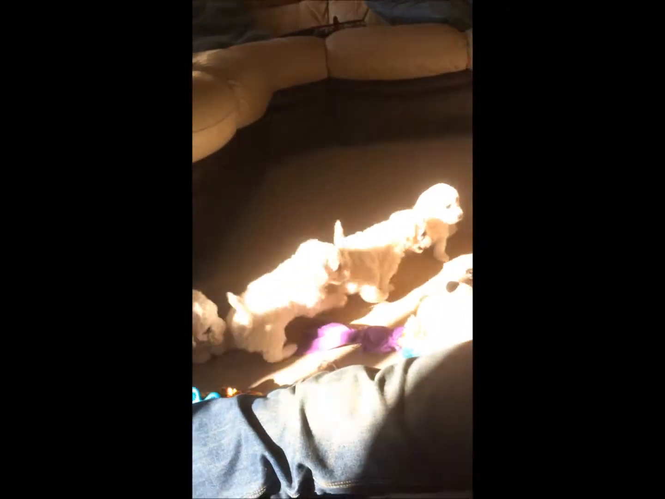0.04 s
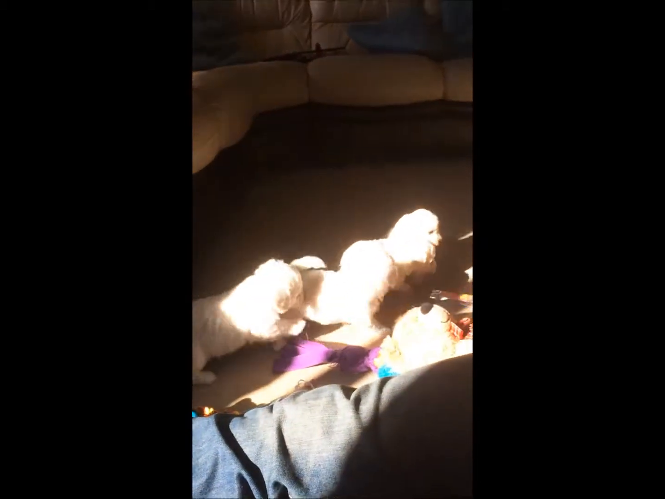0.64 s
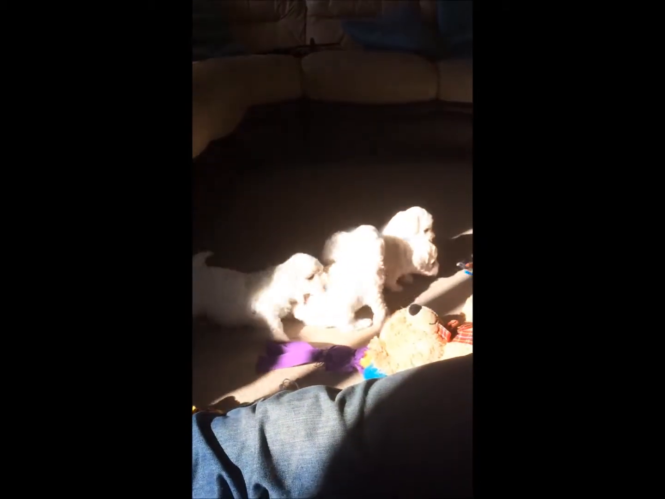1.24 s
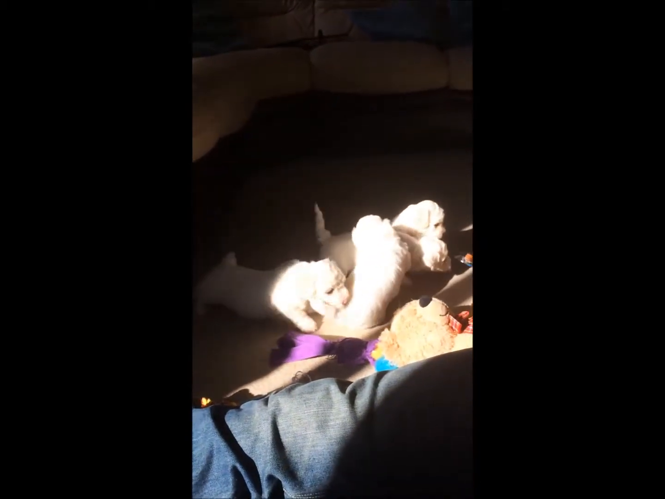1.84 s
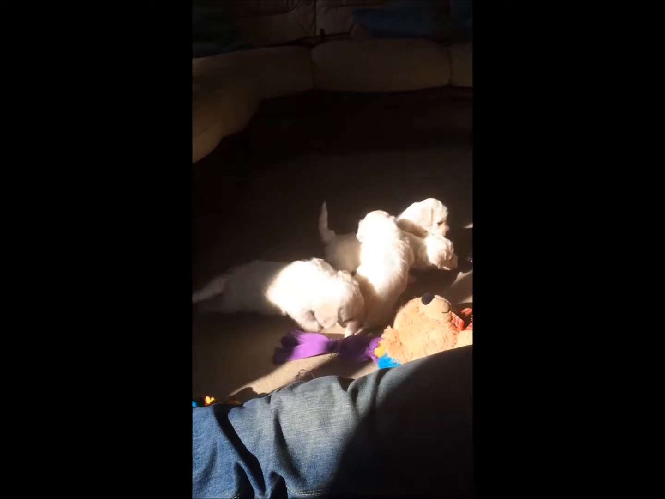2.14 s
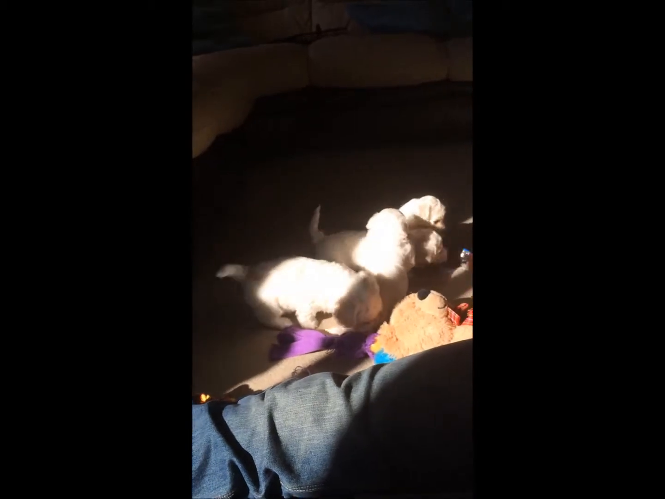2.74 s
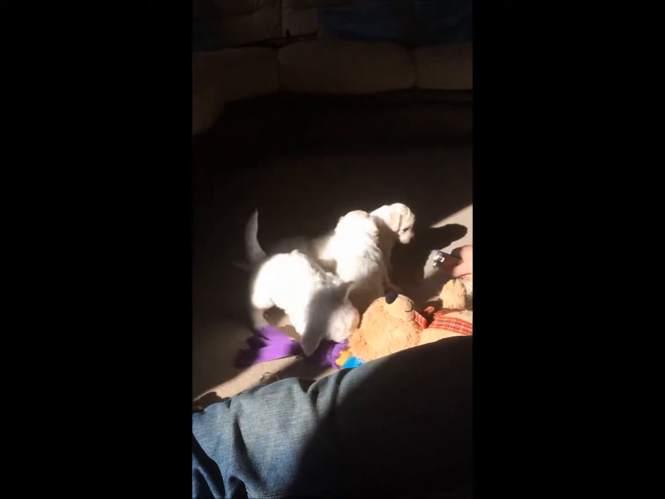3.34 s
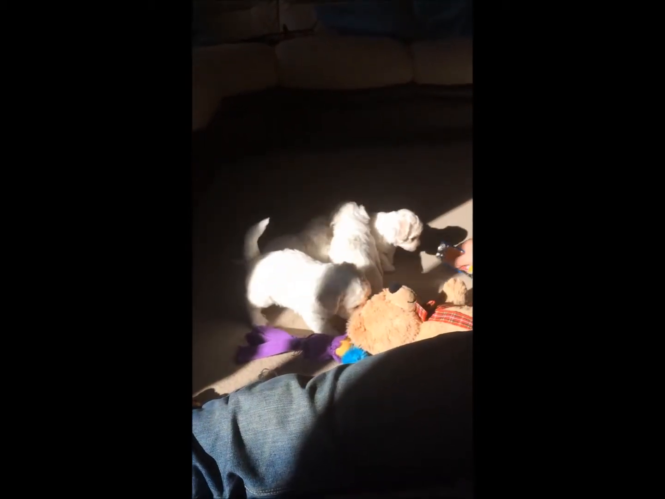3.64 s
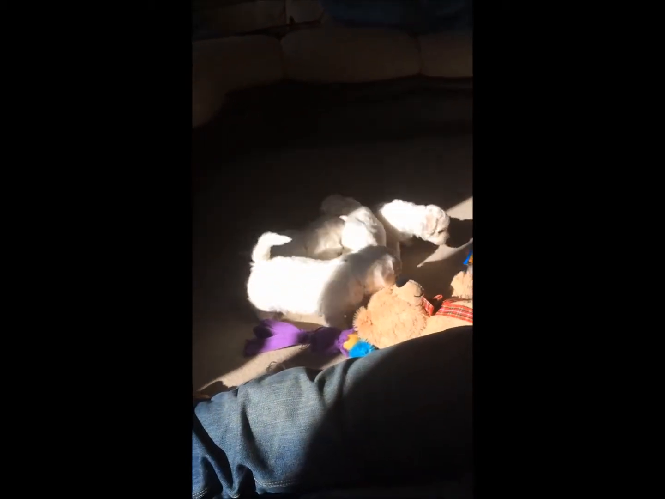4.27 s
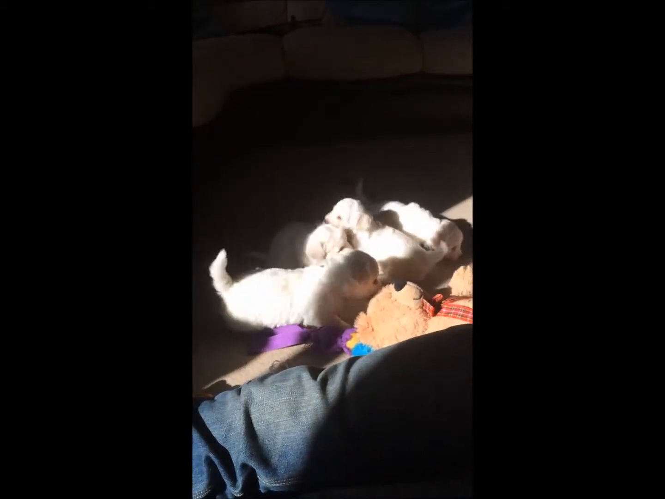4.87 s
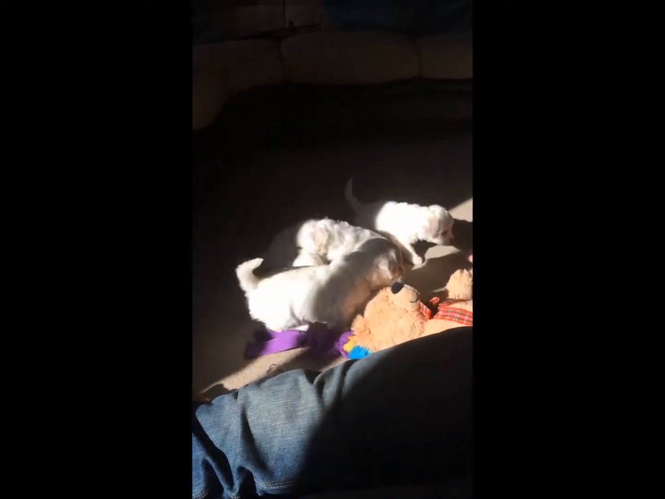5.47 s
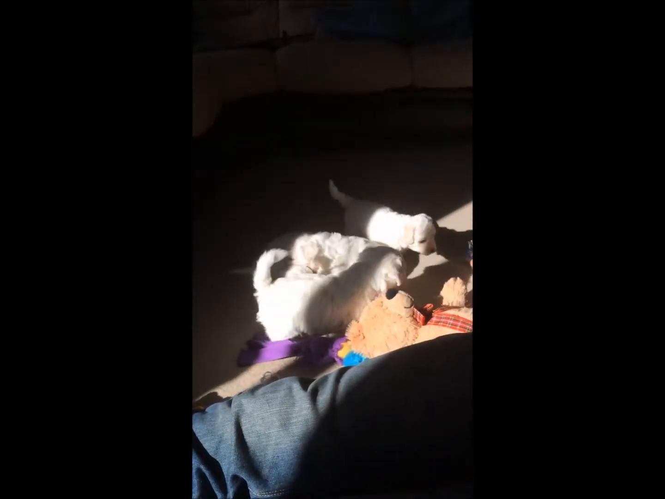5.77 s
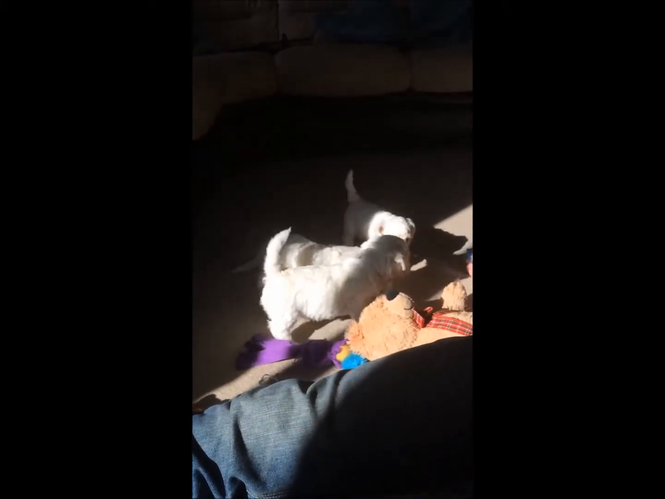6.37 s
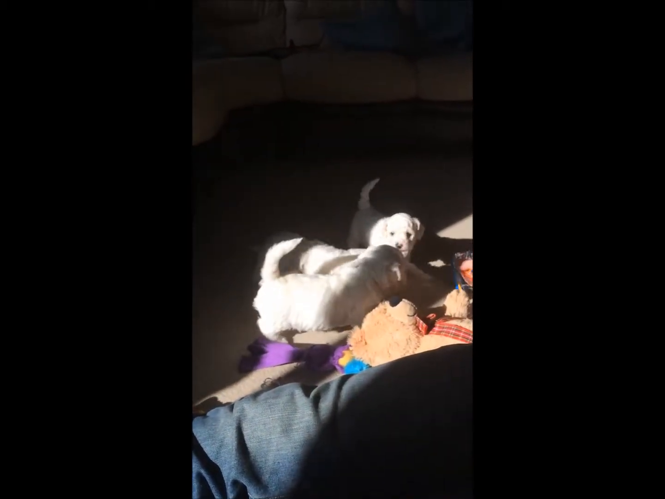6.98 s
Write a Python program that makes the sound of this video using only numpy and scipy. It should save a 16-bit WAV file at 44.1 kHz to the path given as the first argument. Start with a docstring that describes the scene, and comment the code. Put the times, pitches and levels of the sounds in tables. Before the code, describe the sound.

Soft bumps on the floor and a grainy rustle of fur and cloth open the scene as puppies play with a crinkly toy. Their tugs soon draw busier, crisper crackling from the film inside, with the sharpest snap a little past the middle. A few small clicks of claws or teeth come through. The microphone is near the play in a quiet, furnished room, where an appliance hums faintly throughout.

```python
"""Crinkly film snaps and crackles inside a soft toy as puppies worry it on a living-room floor.
Each tug works the film harder: big creases pop through, countless small ones give way in clumps.
Fur and fabric catch and slip in a grainy hiss, claws and teeth rap on the toy, and paws and bodies
thud on the floor. Short room reflections surround the play, and an appliance hums faintly behind it."""
import sys
import numpy as np
from scipy import signal
from scipy.fft import rfft, irfft
from scipy.io import wavfile
from scipy.ndimage import uniform_filter1d

SR = 44100
rng = np.random.default_rng(int(sys.argv[2]) if len(sys.argv) > 2 else 0)


def to_wav(s):
    """Save 16-bit WAV."""
    ch = np.atleast_2d(s).T  # columns
    pcm = np.round(np.clip(ch, -1, 1) * 32767)  # PCM
    wavfile.write(sys.argv[1], SR, pcm.astype(np.int16))


N = 313551
TIME = np.arange(N) / SR

# partials of the appliance hum: (frequency [Hz], rms level [dB])
HUM_PARTIALS = [(99.3, -69), (125.5, -80)]
# tone of the room air, shifting bodies, fur, fabric and film: (frequency [Hz], relative level [dB])
AIR_SPECTRUM = [(25, -30), (45, -3), (68, 7.5), (85, -22), (108, -31), (125, 3), (165, -9.5), (240, -7.5),
                (330, -6), (450, -5), (700, -17), (1500, -20), (4000, -17), (5000, -19), (15000, -28)]
BODY_SPECTRUM = [(40, -3.5), (68, 0), (95, 3), (135, 4.5), (220, -3.5), (400, -4.5), (1000, -25.5),
                 (4000, -35)]
FUR_SPECTRUM = [(200, -1.5), (280, -7.5), (420, 0.5), (600, 0.5), (850, 0), (1200, -2), (1500, -3.5),
                (2200, -27), (6000, -36)]
FABRIC_SPECTRUM = [(600, -17), (1100, -0.5), (1500, 1.5), (1950, 2.5), (2300, 1.5), (3100, -1),
                   (3700, -2.5), (4800, -14.5), (8000, -17), (15000, -46)]
FILM_SPECTRUM = [(1500, -20.5), (2800, -2), (3800, -2), (5200, -0.5), (7000, -3.5), (9000, -6), (11500, -8),
                 (13500, -5), (15500, -9.5)]
# the litter's constant stirring: (time [s], fur level [dB], fabric level [dB], film level [dB])
STIR_LEVELS = [(0, -66, -59, -63), (0.299, -63, -56.5, -59), (.6, -58.5, -58.5, -61),
               (0.748, -67.5, -62, -68), (1.2, -64, -63, -63), (1.78, -78, -70.5, -73),
               (2.1, -71.5, -65, -66.5), (2.451, -72.5, -68, -68), (2.7, -74.5, -79, -79.5),
               (2.85, -69, -71, -68.5), (3.17, -66, -64.5, -68), (3.6, -66.5, -58, -59),
               (4.2, -68.5, -61.5, -59), (5.0, -66.5, -58.5, -60), (5.44, -72.5, -63.5, -63),
               (5.981, -69.5, -59.5, -59), (6.08, -71, -63, -64), (6.35, -71.5, -64, -64.5),
               (7.11, -76, -66.5, -58)]
# a puppy tugs at the toy: (start [s], length [s], fabric level [dB], film level [dB])
TOY_TUGS = [(0.021, 0.035, -67, -59), (0.146, 0.038, -53, -58), (0.272, 0.11, -63.5, -57),
            (0.518, 0.066, -70, -62), (0.932, 0.022, -60, -65), (0.988, 0.11, -65, -57),
            (1.088, .05, -52.5, -56), (1.194, .04, -68, -61), (1.314, 0.023, -62, -60),
            (1.476, 0.023, -61, -58), (1.606, 0.011, -59.5, -56), (1.828, 0.048, -61.5, -59.5),
            (1.977, 0.037, -62, -60), (2.103, 0.018, -59.5, -54.5), (2.228, 0.019, -55.5, -55.5),
            (2.328, 0.014, -55, -51), (2.37, .04, -54.5, -56), (2.736, 0.033, -50.5, -53),
            (2.782, 0.062, -44.5, -47), (2.829, .055, -48, -47), (2.915, .02, -52.5, -52),
            (2.969, 0.023, -53.5, -55.5), (3.208, 0.04, -51, -51.5), (3.26, 0.032, -44.5, -46),
            (3.312, .035, -54, -52), (3.456, 0.078, -49, -46), (3.657, 0.034, -59, -54),
            (3.744, 0.046, -47, -45), (3.879, 0.017, -52.5, -46), (3.967, 0.049, -51.5, -48),
            (4.061, 0.053, -61.5, -55.5), (4.273, 0.049, -50.5, -51.5), (4.37, 0.044, -53.5, -48),
            (4.453, 0.022, -58.5, -51), (4.589, 0.077, -56.5, -50), (4.682, 0.13, -61, -49.5),
            (4.812, 0.032, -50.5, -44.5), (4.921, 0.013, -50.5, -37), (5.163, 0.059, -52.5, -49.5),
            (5.32, .015, -63, -53.5), (5.495, 0.053, -55.5, -55), (5.699, 0.092, -54.5, -50),
            (5.799, 0.037, -62, -49.5), (5.88, 0.098, -74, -50.5), (6.131, 0.033, -55.5, -53.5),
            (6.192, .06, -54, -50), (6.381, 0.039, -57.5, -53), (6.446, 0.022, -49, -48),
            (6.483, 0.049, -48.5, -45), (6.549, 0.03, -52, -51.5), (6.625, 0.062, -55.5, -50),
            (6.692, 0.019, -67, -56.5), (6.796, 0.016, -59, -52.5), (6.833, 0.013, -50, -44.5),
            (6.969, 0.059, -57, -52.5), (7.036, 0.031, -52.5, -48)]
# paws and bodies hit the floor: (time [s], level [dB], pitch [Hz], 60 dB decay time [s])
FLOOR_BUMPS = [(0.021, -40, 68, 0.32), (0.042, -46, 413, 0.22), (0.147, -53, 128.5, 0.6),
               (0.196, -37, 410, 0.057), (0.234, -52.5, 135, 0.35), (0.3, -49.5, 516, 0.26),
               (0.336, -40, 414, 0.09), (0.533, -42.5, 124.8, 0.23), (0.585, -34.5, 134, 0.15),
               (0.591, -52, 297, 0.2), (0.632, -48.5, 123, 0.72), (0.829, -40.5, 132, 0.054),
               (1.321, -32.5, 160, 0.061), (1.341, -37.5, 483, 0.019), (1.372, -45.5, 90, 0.16),
               (1.496, -41, 115, 0.049), (1.954, -54.5, 130.8, 0.39), (2.279, -42.5, 138.4, 0.16),
               (3.087, -35.5, 640, 0.016), (3.202, -41, 127.7, 0.15), (3.288, -32, 109.6, 0.1),
               (3.29, -43, 256.4, 0.066), (3.331, -40, 102, 0.14), (4.297, -47, 512, 0.045),
               (4.52, -39, 98, 0.053), (4.766, -53, 80.5, 0.097), (5.653, -50, 146.4, 0.12),
               (5.868, -38.5, 360, 0.049), (5.873, -43, 127.7, 0.063), (5.908, -41.5, 110, 0.077),
               (6.134, -50, 170, 0.076), (6.716, -32.5, 490, 0.023), (6.747, -50, 76, 0.056)]
# claws and teeth hit the toy: (time [s], level [dB], pitch [Hz], 60 dB decay time of the rasp [s])
TOY_KNOCKS = [(0.1782, -36, 2050, 0.011), (.074, -38, 780, 0.011), (1.714, -50.5, 485, 0.044),
              (1.975, -43.5, 1910, 0.012), (2.507, -54.5, 588, 0.024), (2.8785, -30, 2020, 0.0059),
              (4.835, -37, 1920, 0.011), (5.599, -34.5, 2120, 0.01), (6.779, -45, 2290, 0.014)]
# how much the film creases rather than slides: (time [s], grain level against hiss [dB])
CREASE_BALANCE = [(0, -3.5), (1.15, -11), (1.5, -0.5), (2.7, 2), (3.6, 5), (5.2, 1), (7.1, 5)]
# big creases of the film popping through: (time [s], level [dB], pitch [Hz])
BIG_CREASES = [(.144, -47.5, 8900), (.381, -46.5, 5800), (.973, -53, 6300), (1.1481, -47, 7100),
               (1.223, -51, 5500), (1.4033, -54.5, 4660), (1.4769, -41, 8550), (1.881, -48.5, 6130),
               (2.373, -42, 6400), (2.7697, -48, 5800), (2.8434, -33.5, 6400), (2.871, -50, 7580),
               (2.8786, -30.5, 2860), (2.935, -40, 9820), (2.9818, -47, 4940), (3.2027, -39.5, 4400),
               (3.2742, -37, 7830), (3.2918, -36, 6660), (3.3173, -39, 7400), (3.3575, -47, 6300),
               (3.4357, -50, 6600), (3.5335, -37.5, 9000), (3.5663, -39, 4530), (3.6059, -44.5, 8750),
               (3.6784, -40, 5770), (3.7237, -50, 7040), (3.779, -35.5, 7470), (3.8165, -40, 7750),
               (3.8853, -38, 6540), (3.8969, -33, 6970), (3.9386, -37.5, 7580), (3.99, -37, 7230),
               (4.0094, -34, 8000), (4.0145, -37, 7900), (4.2619, -36, 8140), (4.311, -40, 7310),
               (4.3547, -40, 9120), (4.4093, -35.5, 6030), (4.4615, -36.5, 5650), (4.4998, -42.5, 7660),
               (4.5812, -39.5, 7180), (4.619, -33.5, 6660), (4.6755, -36, 6600), (4.7047, -36, 4900),
               (4.7354, -30, 7610), (4.7989, -34, 6870), (4.8339, -18, 9000), (4.843, -31, 6970),
               (4.92, -32, 10280), (4.9397, -29, 8770), (4.9501, -34, 6400), (5.047, -46, 7640),
               (5.1234, -42, 6060), (5.153, -36, 9670), (5.171, -41, 5110), (5.1817, -40.5, 7150),
               (5.1962, -38, 9540), (5.247, -44, 8170), (5.5039, -43, 4820), (5.581, -43.5, 7100),
               (5.5385, -39, 5160), (5.704, -37.5, 6210), (5.728, -41.5, 7650), (5.7692, -43.5, 7280),
               (5.8105, -39.5, 9040), (5.848, -43, 10500), (5.968, -37, 10700), (6.091, -44, 10000),
               (6.126, -37, 6700), (6.2317, -39.5, 4400), (6.252, -43, 9300), (6.4099, -45, 6300),
               (6.4472, -37.5, 6420), (6.461, -37, 7740), (6.5057, -33.5, 5940), (6.5212, -36, 5170),
               (6.5545, -32, 4270), (6.6681, -37, 6200), (6.7965, -33.5, 10100), (6.84, -34.5, 7230),
               (6.9682, -43.5, 4600), (7.012, -43, 6250), (7.0987, -42.5, 6020)]

# faders, added to the levels in the tables
SHUFFLE_DB, BUMP_DB, FABRIC_DB, CRACKLE_DB, SNAP_DB = -3.5, -2.5, -2.5, -2, 2.5


def from_db(db):
    """Decibels to amplitude."""
    return 10 ** (np.asarray(db) / 20)


def unit_rms(x):
    """Scale to an rms of 1."""
    return x / np.sqrt(np.mean(x ** 2) + 1e-20)


def level_out(x):
    """Ride the running level towards 1 and keep the fine grain."""
    x = unit_rms(x)
    return x / np.sqrt(np.maximum(uniform_filter1d(x ** 2, size=1800), 0) + 0.0079)


def add(out, start_s, sound):
    """Mix a short sound in at start_s."""
    at = int(np.clip(round(start_s * SR), 0, N - 1))
    out[at:at + len(sound)] += sound[:N - at]


def drift(rate_hz):
    """Smooth random modulation with a spread of 1."""
    pole = np.exp(-40 * np.pi * rate_hz / SR)
    noise = rng.standard_normal(N // 20 + 4002)
    slow = signal.lfilter([1], [1, -2 * pole, pole * pole], noise)[4000:]
    return np.interp(np.arange(N) / 20, np.arange(len(slow)), unit_rms(slow))


def colour(x, spectrum):
    """Minimum-phase EQ with the given curve; white noise keeps its power."""
    hz, db = np.transpose(spectrum)
    size = 2 ** 13
    grid = np.maximum(np.fft.rfftfreq(size, 1 / SR), 1)
    curve = from_db(np.interp(np.log(grid), np.log(hz), db))
    gain = unit_rms(curve * np.minimum(grid / hz[0], 1))
    cepstrum = irfft(np.log(gain + 1e-9))
    cepstrum[1:size // 2] *= 2
    cepstrum[size // 2 + 1:] = 0
    return signal.fftconvolve(x, irfft(np.exp(rfft(cepstrum))))[:len(x)]


def cut(x, kind, hz, order=2):
    """Butterworth low-, high- or band-pass."""
    return signal.sosfilt(signal.butter(order, hz, kind, fs=SR, output="sos"), x)


def resonate(x, hz, q):
    """One resonance, with a gain of 1 at its peak."""
    return signal.lfilter(*signal.iirpeak(min(hz, .4 * SR), q, fs=SR), x + 1e-18)


def noise_band(length, hz, q):
    """Noise around one pitch, at an rms of 1."""
    return unit_rms(resonate(resonate(rng.standard_normal(length), hz, q), hz, q))


def room_tone(air_db=-70, waver_db=1.5):
    """A bed of room air and the softly wavering hum of an appliance."""
    waver, phase = waver_db * drift(2), .2 * drift(.7)
    hum = sum(from_db(db + waver) * np.sqrt(2) * np.sin(2 * np.pi * hz * TIME + phase)
              for hz, db in HUM_PARTIALS)
    return hum + from_db(air_db) * colour(rng.standard_normal(N), AIR_SPECTRUM)


def room_tail(t60_s=.32, treble_t60_s=.0576, split_hz=8000, predelay_s=.001):
    """Diffuse reflections; the furniture soaks up the treble first."""
    t = TIME[:SR // 2]
    mids = cut(rng.standard_normal(len(t)), "band", [220, split_hz]) * from_db(-60 * t / t60_s)
    treble = cut(rng.standard_normal(len(t)), "high", split_hz) * from_db(-60 * t / treble_t60_s)
    tail = (mids + 1.34 * treble) * (t > predelay_s)
    return tail / np.sqrt(np.sum(tail ** 2))


def living_room(x, places=12, wet_db=-12):
    """The puppies keep moving, so the reflections crossfade from place to place."""
    position = np.linspace(0, places - 1, N)
    sends = (np.sqrt(np.maximum(1 - np.abs(position - k), 0)) for k in range(places))
    wet = sum(signal.oaconvolve(x * send, room_tail())[:N] for send in sends)
    return x + from_db(wet_db) * wet


def play_levels(attack_s=.012, build_db=3.5, release_db_per_s=230, fur_in_tug_db=-11.5):
    """Fur, fabric and film envelopes in dB: over the stirring, each tug grabs, builds and lets go."""
    times, *levels = np.transpose(STIR_LEVELS)
    fur, fabric, film = [from_db(np.interp(TIME, times, db)) ** 2 for db in levels]  # add as powers
    t = TIME[:SR // 2]
    for start, length, fabric_db, film_db in TOY_TUGS:
        build = from_db(-build_db * np.maximum(1 - t / length, 0))
        release = from_db(-release_db_per_s * np.maximum(t - length, 0))
        envelope = np.minimum(t / attack_s, 1) * build * release
        add(fur, start, (from_db(fabric_db + fur_in_tug_db) * envelope) ** 2)
        add(fabric, start, (from_db(fabric_db) * envelope) ** 2)
        add(film, start, (from_db(film_db) * envelope) ** 2)
    return 10 * np.log10([fur, fabric, film])


def body_shuffle(fur_db, follow=.64):
    """Bodies shifting on the floor rumble softly along with the brushing of fur."""
    level_db = fur_db.mean() + follow * (fur_db - fur_db.mean())
    return from_db(level_db + SHUFFLE_DB) * colour(rng.standard_normal(N), BODY_SPECTRUM)


def floor_bumps(attack_s=.0019, sag_hz=68):
    """Padded blows: a damped swing of the floor, a dull scuff and, under the low ones, a slower sag."""
    out, t = np.zeros(N), TIME[:SR // 3]
    for start, db, hz, t60 in FLOOR_BUMPS:
        swing = np.sin(2 * np.pi * hz * t)
        scuff = .51 * noise_band(len(t), hz, q=1.05)
        sag = .42 * (hz < 200) * np.sin(2 * np.pi * sag_hz * t)
        envelope = from_db(db + BUMP_DB - 60 * t / t60) * (1 - np.exp(-t / attack_s))
        add(out, start, envelope * (swing + scuff + sag))
    return cut(out, "high", 40)


def toy_knocks():
    """A claw or tooth meets the toy: a dry rasp with a ping that dies twice as fast."""
    out, t = np.zeros(N), TIME[:SR // 16]
    for start, db, hz, t60 in TOY_KNOCKS:
        decay = from_db(-60 * t / t60)
        ping = np.sin(2 * np.pi * hz * t) * decay ** 2
        rasp = noise_band(len(t), hz, q=1.4) * decay
        add(out, start, from_db(db) * (ping + rasp) / np.sqrt(2))
    return out


def fibre_rub(level_db, spectrum, catch_db, catch_hz):
    """Fibres catch and slip, so the friction hiss is grainy."""
    friction = unit_rms(rng.standard_normal(N) * from_db(catch_db * drift(catch_hz)))
    return from_db(level_db) * colour(friction, spectrum)


def film_crackle(level_db, clicks_per_s=1000, clump_db=4.5, size_db=2.5, crisp_hz=9000):
    """Countless small creases give way in clumps over a sliding hiss; their balance changes over time."""
    effort_db = level_db - level_db.mean()
    rate = clicks_per_s * from_db(.5 * effort_db + clump_db * drift(45))
    sizes = from_db(size_db * np.minimum(rng.exponential(1, N), 11.3)) * rng.choice([-1, 1], N)
    clicks = sizes * (rng.random(N) < rate / SR)
    facet_hz = np.geomspace(3000, 14000, 10)
    facet = rng.choice(len(facet_hz), N)  # each click rings one facet of the film
    grains = level_out(sum(resonate(clicks * (facet == k), hz, q=5.6) for k, hz in enumerate(facet_hz)))
    grain_db = np.interp(TIME, *np.transpose(CREASE_BALANCE)) + .067 * effort_db
    slide = rng.standard_normal(N)
    film = level_out(colour(from_db(grain_db) * grains + slide, FILM_SPECTRUM))
    # the film goes taut and slack by chance, and taut film sounds crisper
    tilt_db = .8 + 2.5 * drift(3.3)
    low = cut(film, "low", crisp_hz, order=4) * from_db(-tilt_db / 2)
    top = cut(film, "high", crisp_hz, order=4) * from_db(tilt_db / 2)
    return from_db(level_db + CRACKLE_DB) * (low + top)


def lesser_creases(film_db, brisk_db=-53.5, pops_per_s=30, pop_db=-51, pop_hz=7100, count=400):
    """Strain lets go unevenly, faster and louder under effort: (time [s], level [dB], pitch [Hz])."""
    effort_db = film_db - brisk_db  # pops_per_s and pop_db hold when the film is at brisk_db
    strain = np.cumsum(pops_per_s * from_db(.9 * effort_db)) / SR
    delay, size, detune = np.clip(rng.standard_normal((count, 3)), -2, 2).T
    thresholds = np.arange(count) + delay
    times = np.interp(thresholds, strain, TIME)
    db = pop_db + .49 * np.interp(times, TIME, effort_db) + 1.5 * size
    hz = pop_hz * 2 ** (.35 * detune)
    return np.transpose([times, db, hz])[(thresholds > 0) & (thresholds < strain[-1])]


def film_snaps(creases, splinter_s=.0003, lag_s=.0003, body_hz=1884, body_db=-4, max_snaps=500):
    """A crease starts to slip, pops in one jump, splinters and rings its own facet of film."""
    out, t = np.zeros(N), TIME[:512] - TIME[64]  # the jump is at t = 0
    splinters = .37 * np.exp(np.where(t < 0, 2 * t, -t / 2) / splinter_s)
    for (start, db, hz), noise in zip(creases, rng.standard_normal((max_snaps, len(t)))):
        push = splinters * noise
        push[t == 0] = np.sign(noise[0])
        pop = resonate(push, hz, q=1.36)
        detune = 1.01 * from_db(.63 * np.clip(noise[-1], -2, 2))
        ring = .53 * resonate(push, hz * detune, q=2.3)
        body = from_db(body_db) * resonate(push, body_hz, q=4.96)
        # a small facet radiates little below its own pitch
        snap = cut(pop + ring, "band", [min(.35 * hz, 9000), 15000]) + body
        snap *= np.sqrt(.0013 * SR / np.sum(snap ** 2))  # the energy of 1.3 ms at an rms of 1
        add(out, start + lag_s + t[0], from_db(db + SNAP_DB) * snap)
    return out


def scene():
    """The play, with the crinkly film up front, heard in the room in mono."""
    fur_db, fabric_db, film_db = play_levels()
    fur = fibre_rub(fur_db, FUR_SPECTRUM, catch_db=3.5, catch_hz=110)
    fabric = fibre_rub(fabric_db + FABRIC_DB, FABRIC_SPECTRUM, catch_db=3, catch_hz=123)
    film = film_crackle(film_db) + film_snaps([*BIG_CREASES, *lesser_creases(film_db)])
    play = film + fur + fabric + toy_knocks() + floor_bumps() + body_shuffle(fur_db)
    return (living_room(play) + room_tone())[None]


def record(dry):
    """A steep high cut at 15.4 kHz."""
    return signal.sosfilt(signal.ellip(10, .2, 70, 15400, fs=SR, output="sos"), dry)


dry = scene()
out = record(dry)
to_wav(out)
```